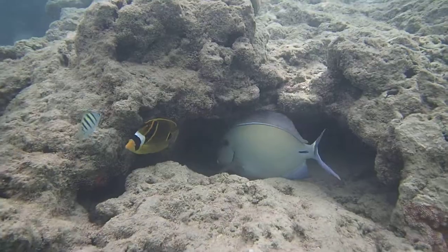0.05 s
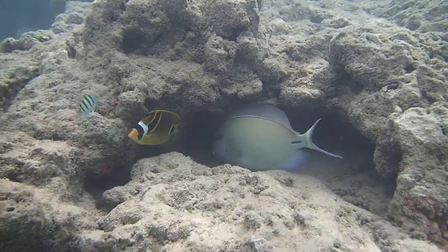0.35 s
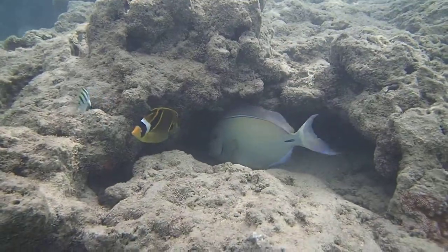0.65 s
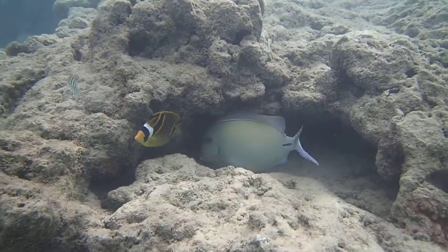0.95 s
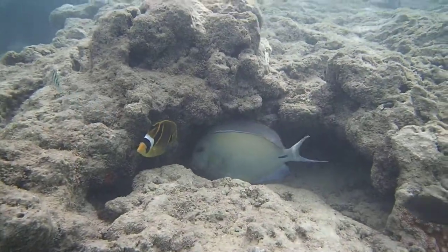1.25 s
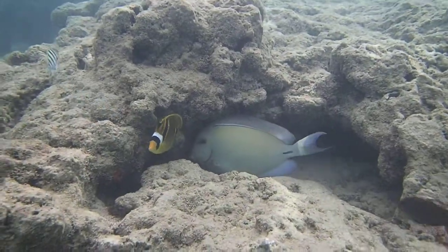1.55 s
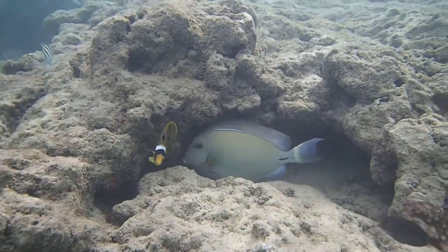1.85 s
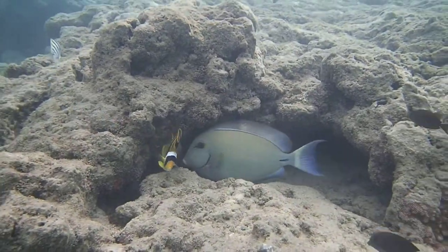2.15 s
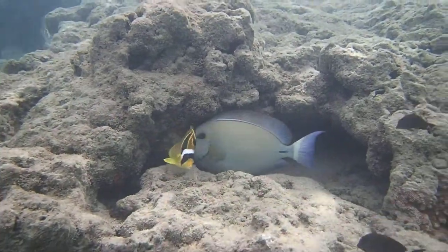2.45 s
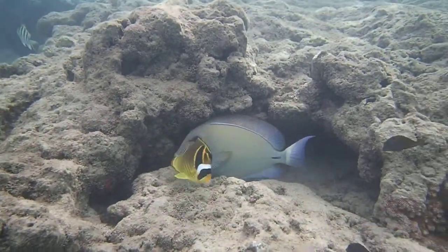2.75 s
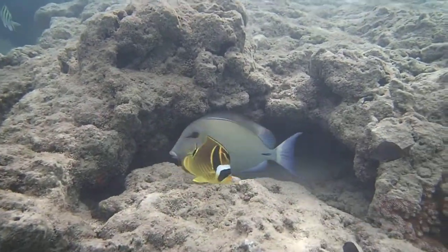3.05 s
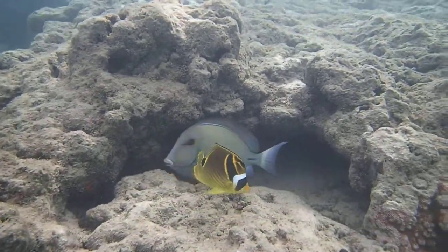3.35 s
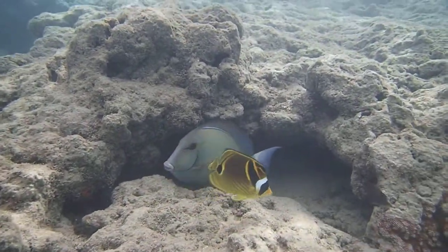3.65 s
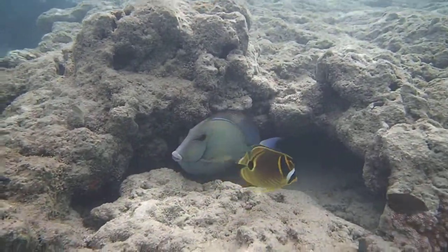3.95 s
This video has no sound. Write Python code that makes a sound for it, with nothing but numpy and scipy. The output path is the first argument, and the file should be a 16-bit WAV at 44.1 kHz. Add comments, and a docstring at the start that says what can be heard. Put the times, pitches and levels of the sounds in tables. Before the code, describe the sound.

A fast, hollow ticking buzzes close to the microphone inside an underwater camera. After it stops, the case takes soft knocks and little bubbles blip. Scattered shrimp clicks and a low water rumble continue throughout on the reef.

```python
"""A mechanism inside an underwater camera ticks back and forth, thirty ticks a second, then stops.
Each stroke excites the damped modes of the case. Snapping shrimp crackle on the reef all around:
their pressure spikes scatter off the rocks and are filtered by the case. Water rumbles against the case
and swells towards the end, a few small bubbles ring, and the case takes some soft bumps.
Two microphone ports pick it all up over a faint hiss, the left one more strongly."""
import sys
import numpy as np
from scipy import signal
from scipy.fft import rfft, irfft, next_fast_len
from scipy.io import wavfile
from scipy.ndimage import map_coordinates

SR = 44100
rng = np.random.default_rng(int(sys.argv[2]) if len(sys.argv) > 2 else 0)


def waveform_to_disk(signal):
    """Save audio, clipped to [-1, 1], as 16-bit WAV at the path in sys.argv[1]."""
    frames = np.transpose(np.atleast_2d(signal))
    scaled = np.clip(frames, -1, 1) * 32767
    samples = np.round(scaled).astype(np.int16)
    wavfile.write(sys.argv[1], SR, samples)


N = 176400
LEAD_IN_S = .01
STROKE_T = np.arange(SR // 10) / SR - LEAD_IN_S  # time from the centre of a stroke [s]

# low, middle and high parts of a snap heard through the case (frequency [Hz], level [dB])
KNOCK = [(150, -26), (780, 0), (1550, -1), (1850, -9), (2200, -7), (2700, -19), (4000, -50)]
CRACK = [(900, -25), (2100, 1), (2750, 0), (3500, -9), (4050, -28), (6000, -45)]
FIZZ = [(1500, -20), (3500, -11), (4050, -26), (4900, -4), (6300, 2), (7300, -12), (8200, -7), (9800, -23),
        (16000, -28)]
# spectrum of water rumbling on the case (frequency [Hz], level [dB])
RUMBLE = [(15, -7.5), (35, -1), (88, -1.5), (106, 6.5), (128, -1), (215, 2.5), (275, -5.5), (2000, -46.5)]


def mechanism(start_s=.0102, stop_s=2.36, period_s=.033372, forward_db=-14.5, scrape_db=-14):
    """Periodic impact excitation: long strokes led by a scrape alternate with short, clean returns."""
    # strength of the return strokes (time [s], level [dB])
    return_levels = [(.39, -18.5), (.51, -14), (1.04, -13.5), (1.11, -18.5), (1.51, -18), (1.58, -14),
                     (2.0, -12.5), (2.08, -16.5), (2.31, -14.5)]
    # spectrum of the scrape (frequency [Hz], level [dB])
    scrape_spectrum = [(500, -25), (1030, 9.5), (1450, -4), (1830, -14.5), (2060, -4.5), (2400, -28.5),
                       (3250, -25), (3900, -47.5)]
    late_s, early_s, scrape_lead_s = .00097, .0006, .00307
    out = np.zeros(N)
    times = np.arange(start_s, stop_s, period_s)
    for k, s in enumerate(times):
        db = 1.1 * rng.normal() + (-6 if k == len(times) - 1 else 0)  # the last tick is weaker
        if k % 2:
            return_db = np.interp(s, *np.transpose(return_levels))
            add(out, s - early_s - LEAD_IN_S, amp(db + return_db) * stroke(width_s=.001527, hz=771))
        else:
            add(out, s + late_s - LEAD_IN_S, amp(db + forward_db) * stroke(width_s=.002025, hz=752))
            scrape = snap(scrape_spectrum, scatter=.25, scatter_t60=.027)
            add(out, s + late_s - scrape_lead_s, amp(db + forward_db + scrape_db) * scrape)
    return out


def stroke(width_s, hz, sag_hz_per_s=8000, spread_hz=14, roughness=.16, build_s=.005):
    """Modal ringing: a rough, falling burst of the case's main resonance leaves its modes to decay."""
    # modes of the case (frequency [Hz], level [dB], T60 [s])
    case_modes = [(682.4, -10, 0.064), (762.8, -5.5, 0.056), (851.6, -25, 0.32)]
    t = STROKE_T
    start_phase = rng.random()
    knots = (t + LEAD_IN_S) / width_s + [[0], [len(t) // 2]]
    grit, waver = map_coordinates(rng.standard_normal(len(t)), [knots])
    cycles = (hz + spread_hz * rng.normal()) * t - sag_hz_per_s * t ** 2 / 2 + start_phase
    envelope = np.exp(-(t / width_s) ** 2 / 2) * (1 + roughness * grit)
    out = envelope * np.sin(2 * np.pi * cycles + roughness * waver)
    age = np.maximum(t, 0)
    build_up = 1 - np.exp(-(age / build_s) ** 2)
    for mode_hz, db, t60 in case_modes:
        cycles = (mode_hz + spread_hz * rng.normal()) * t + start_phase
        out += amp(db + 2 * rng.normal() - 60 * age / t60) * build_up * np.sin(2 * np.pi * cycles)
    return out


def near_shrimp(ring_db=-3, ring_t60=.0035):
    """Impulse excitation: each snap is a knock, a crack, a brief ring and a fizz with echoes per port."""
    # near snaps (time [s], knock level [dB], crack level [dB], fizz level [dB], ring frequency [Hz])
    snaps = [(0.2848, -29.5, -33, -26.5, 10760), (0.395, -22.5, -30.5, -34, 5600),
             (0.57, -21, -37.5, -36.5, 5250), (0.8392, -27.5, -39, -35, 6400),
             (0.9265, -13.5, -17, -21.5, 7930), (0.97, -38.5, -35, -31, 5540),
             (1.0932, -22.5, -42, -36, 6000), (1.4242, -17.5, -26, -35, 5240),
             (1.4957, -31, -37, -36, 12300), (1.5427, -33, -40, -35.5, 6450),
             (1.585, -40.5, -40.5, -27.5, 6100), (1.7228, -32.5, -36.5, -29, 4980),
             (1.832, -22, -36.5, -31.5, 5330), (1.9699, -26, -36, -37.5, 6300),
             (2.0674, -37, -38, -27, 5370), (2.105, -45, -36, -33, 6000), (2.1427, -23, -31.5, -25, 7300),
             (2.2039, -24.5, -36, -28.5, 5100), (2.4196, -24.5, -34, -34, 5430),
             (2.4337, -22.5, -33, -35, 5600), (2.654, -10.5, -15, -21.5, 8240),
             (2.8472, -25, -23, -25, 6300), (2.8538, -12.5, -24, -22.5, 5470),
             (2.8613, -19.5, -32, -28.5, 5070), (3.0401, -21.5, -38, -33, 5500),
             (3.1518, -23, -29, -24, 6260), (3.5389, -28.5, -41, -30.5, 5400),
             (3.5707, -47, -34, -36.5, 6000), (3.681, -21.5, -38.5, -41, 5850),
             (3.744, -19.5, -29, -31.5, 5440), (3.9841, -5, -15, -17, 7550)]
    out, t = np.zeros((2, N)), np.arange(SR // 100) / SR
    for s, knock_db, crack_db, fizz_db, hz in snaps:
        body = amp(knock_db) * snap(KNOCK) + amp(crack_db) * snap(CRACK)
        ring = amp(fizz_db + ring_db - 60 * t / ring_t60) * np.cos(2 * np.pi * hz * t)
        for port in out:
            add(port, s, body + amp(fizz_db) * snap(FIZZ))
            add(port, s, ring)
    return out


def snap(spectrum, scatter=.07, scatter_t60=.017, size=1024):
    """Convolution: a pressure spike and its scattered echoes pass through the case; envelope peak 1."""
    t = np.arange(size) / SR
    pressure = scatter * rng.standard_normal(size) * amp(-60 * t / scatter_t60)
    pressure[0] += 1
    sound = signal.fftconvolve(pressure, impulse_response(spectrum))
    return sound / np.abs(signal.hilbert(sound)).max()


def far_shrimp(per_s=150, level_db=-60, spread_db=11, scatter=.11, scatter_t60=.021, candidates=4000):
    """Random superposition: distant snaps of very unequal size merge into a crackle from all sides."""
    when, chance = rng.random((2, candidates))
    fires = chance < per_s * N / SR / candidates
    sizes = amp(spread_db * np.minimum(rng.standard_normal(candidates), 1.7)) * fires
    decay = amp(-60 * np.arange(SR // 50) / SR / scatter_t60)
    out = np.zeros((2, N))
    for spectrum, db in (FIZZ, 0), (CRACK, -5), (KNOCK, 0):
        shares = sizes * amp(6 * (2 * rng.random(candidates) - 1))  # each snap has its own timbre
        for port in out:
            port_gains = amp(rng.standard_normal(candidates))
            spikes = np.bincount((when * N).astype(int), shares * port_gains, N)
            echo_envelope = np.sqrt(np.abs(signal.fftconvolve(spikes ** 2, decay ** 2)[:N]))
            pressure = spikes + scatter * echo_envelope * rng.standard_normal(N)
            crackle = signal.fftconvolve(pressure, impulse_response(spectrum))[:N]
            port += amp(level_db + db) * unit(crackle)
    return out


def bumps(rebound=.34):
    """Transient forcing: a soft push and its slower rebound, with a knock and a ring of the case."""
    # bumps (time [s], push level [dB], push width [s], ring level [dB], knock level [dB])
    impacts = [(1.496, -36, 0.00084, -17.5, -31), (2.376, -23, 0.00035, -38, -55),
               (2.7138, -22.5, 0.00057, -23.5, -26), (2.72, -24, 0.0018, -29, -28),
               (2.749, -17, 0.0019, -27.5, -57), (2.787, -29.5, 0.0034, -25.5, -33.5)]
    out = np.zeros(N)
    for s, push_db, width_s, ring_db, knock_db in impacts:
        u = STROKE_T / width_s
        push = rebound * np.exp(-(u / 2 - 1) ** 2) - np.exp(-u ** 2)
        add(out, s - LEAD_IN_S, amp(push_db) * push + amp(ring_db) * stroke(width_s=.00168, hz=750))
        add(out, s, amp(knock_db) * snap(KNOCK, scatter=.057, scatter_t60=.021))
    return out


def bubbles(gurgle_count=7, gurgle_s=.032, gurgle_octaves=.5, gurgle_db=-5, click_db=-17):
    """Volume resonance: each bubble rings at the pitch of its size; weaker ones pinch off with clicks."""
    # main bubbles (time [s], frequency [Hz], level [dB])
    births = [(2.482, 1370, -30), (2.491, 2650, -42.5), (2.573, 2050, -36.5), (2.623, 1290, -38),
              (3.127, 1590, -38), (3.173, 2880, -46), (3.182, 1620, -30), (3.207, 1173, -31.5)]
    out, t = np.zeros(N), np.arange(SR // 12) / SR

    def bubble(hz, t60_cycles):
        """Damped oscillation with a slight random glide."""
        return amp(-60 * t * hz / t60_cycles) * np.sin(2 * np.pi * hz * (t + rng.normal() * t * t))
    for s, hz, db in births:
        add(out, s, amp(db) * bubble(hz, t60_cycles=55))
        for late, higher, size in rng.uniform(-1, 1, (gurgle_count, 3)):
            when, gain = s + gurgle_s * late, amp(db) * (1 + size) / 2
            gurgle = bubble(hz * 2 ** (gurgle_octaves * higher), t60_cycles=45)
            add(out, when, gain * amp(gurgle_db) * gurgle)
            add(out, when, gain * amp(click_db) * snap(CRACK))
    return out


def water(flutter_db=1.0, hollow_db=-33, hollow_growth=2.75):
    """Flow noise: a rumble and a rush rise and fall with the flow; strong flow raises a hollow note."""
    # flow against the case (time [s], rumble level [dB], rush level [dB])
    flow = [(0, -37.5, -38), (.25, -35, -33.5), (0.681, -44.5, -41.5), (1.07, -38.5, -35.5),
            (1.5, -41, -37), (2.032, -38.5, -40.5), (2.17, -50, -46), (2.342, -33, -39), (2.48, -37, -39.5),
            (2.54, -44, -49), (2.98, -42, -48), (3.17, -39, -39.5), (3.5, -35.5, -35), (3.78, -36.5, -33),
            (4, -39.5, -36.5)]
    # spectra of the rush and of the hollow note (frequency [Hz], level [dB])
    rush_spectrum = [(150, -40.5), (330, -1), (420, -4), (510, -3), (565, -9), (680, -6), (850, -10.5),
                     (1150, -22), (2200, -40), (4000, -105)]
    hollow_spectrum = [(200, -34), (370, 3), (425, 12), (480, -6), (800, -56)]
    times, rumble_db, rush_db = np.transpose(flow)
    t = np.arange(N) / SR
    flow_db = np.interp(t, times, rush_db) + flutter_db * wobble(18)
    rumble = amp(np.interp(t, times, rumble_db) + flutter_db * wobble(14)) * noise(RUMBLE)
    hollow = amp(hollow_db + hollow_growth * (flow_db - rush_db.max())) * noise(hollow_spectrum)
    return rumble + amp(flow_db) * noise(rush_spectrum) + hollow


def eddies(level_db=-54):
    """Local turbulence: each port has a faint, uncorrelated rumble of its own."""
    return amp(level_db) * np.array([noise(RUMBLE), noise(RUMBLE)])


def hiss(left_db=-58.5, right_db=-62.5):
    """Self-noise: the two microphones hiss independently."""
    # spectrum of the hiss (frequency [Hz], level [dB])
    spectrum = [(3300, 0), (4050, -10), (5000, 2), (7000, 3), (8000, 7), (9500, 1), (16000, -2)]
    return np.array([amp(db) * noise(spectrum) for db in (left_db, right_db)])


def port_response(hz):
    """Transmission through the case: the two ports differ in level and phase."""
    # left port over right (frequency [Hz], level difference [dB])
    balance = [(750, 6.7), (2500, 7.6), (4000, 4.7), (5600, 9.2), (8100, 4.9)]
    # left port ahead of right (frequency [Hz], phase lead [rad])
    phase_lead = [(400, 0), (800, .35), (3000, 0), (4600, -2), (6500, -1.9), (8400, -4.6)]
    gains = amp(np.array([[1], [-1]]) * along(balance, hz) / 2)
    phases = np.array([[0], [-1]]) * along(phase_lead, hz)
    return gains / gains.mean(0) * np.exp(1j * phases)


def case_notch(hz, centre_hz=4050, width_hz=300, depth_db=-5):
    """Transmission loss: the case weakens one narrow band."""
    return amp(depth_db * np.exp(-((hz - centre_hz) / width_hz) ** 2))


def amp(db):
    """Decibels to gain."""
    return 10 ** (np.asarray(db) / 20)


def unit(x):
    """Normalisation to rms 1."""
    return x / np.sqrt(np.mean(x ** 2) + 1e-20)


def along(points, hz):
    """Interpolation of (frequency [Hz], value) points on a log axis."""
    frequencies, values = np.transpose(points)
    return np.interp(np.log(hz + 1), np.log(frequencies + 1), values)


def wobble(rate):
    """Smooth random modulation, rate knots a second."""
    return map_coordinates(rng.standard_normal(int(N * rate / SR) + 4), [np.arange(N) * rate / SR])


def filtered(x, response):
    """Linear filtering: the spectrum of x times a frequency response."""
    size = next_fast_len(N + SR // 2)
    return irfft(rfft(x, size) * response(np.fft.rfftfreq(size, 1 / SR)), size)[..., :N]


def noise(spectrum):
    """Coloured noise of rms 1."""
    return unit(filtered(rng.standard_normal(N), lambda hz: amp(along(spectrum, hz))))


def impulse_response(spectrum, size=2048):
    """Minimum phase: folding the cepstrum gives a causal response with this spectrum."""
    cepstrum = irfft(np.log(amp(along(spectrum, np.fft.rfftfreq(size, 1 / SR)))))
    cepstrum[1:size // 2] *= 2
    cepstrum[size // 2 + 1:] = 0
    return irfft(np.exp(rfft(cepstrum)))


def add(track, s, sound):
    """Superposition of a sound on a track from time s."""
    i = int(round(s * SR))
    sound, i = sound[max(-i, 0):], max(i, 0)
    track[i:i + len(sound)] += sound[:max(N - i, 0)]


def scene():
    """Superposition: the sources reach both ports through the case and join the noise there."""
    sources = mechanism() + near_shrimp() + far_shrimp() + bubbles() + bumps() + water()
    at_ports = filtered(sources, port_response) + hiss() + eddies()
    return filtered(at_ports, case_notch)


def record(dry):
    """Band limiting: the camera keeps nothing above its cutoff."""
    cutoff_hz = 15950
    return filtered(dry, lambda hz: hz < cutoff_hz)


dry = scene()
out = record(dry)
waveform_to_disk(out)
```